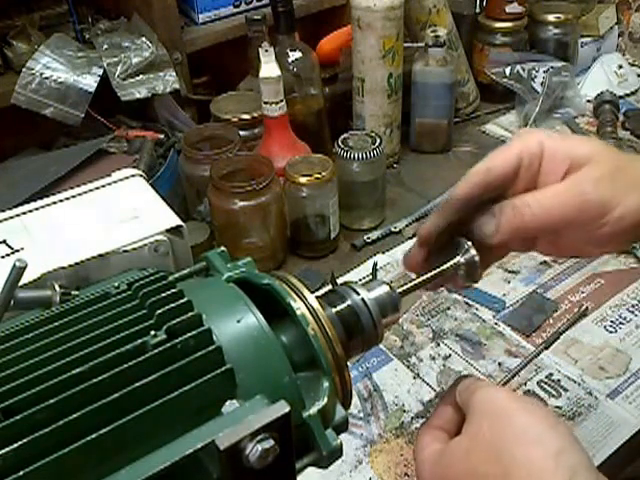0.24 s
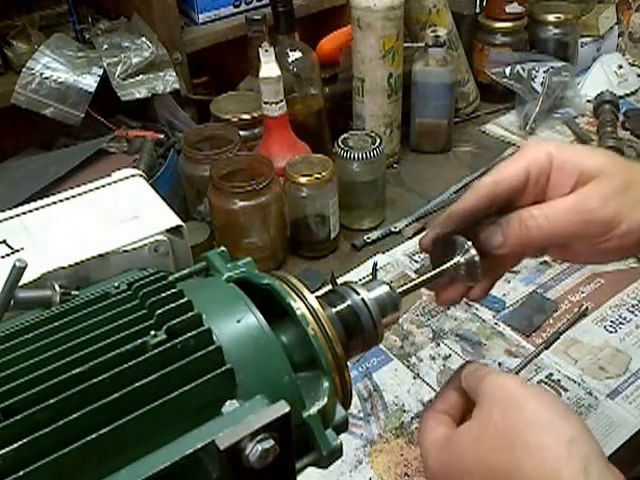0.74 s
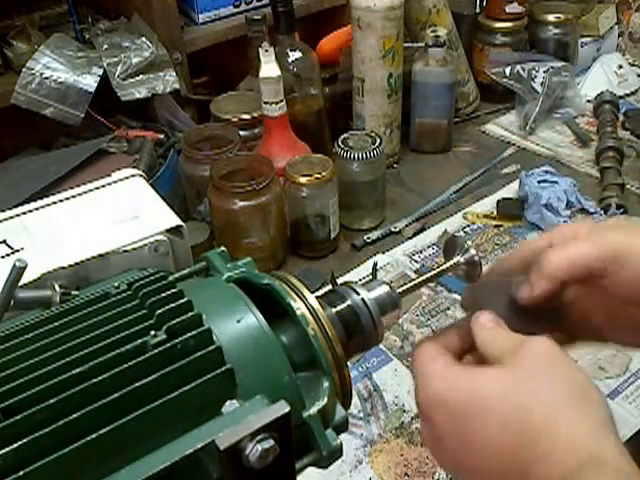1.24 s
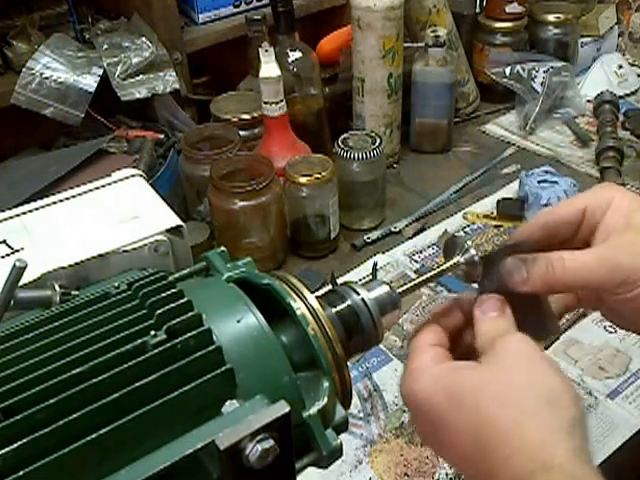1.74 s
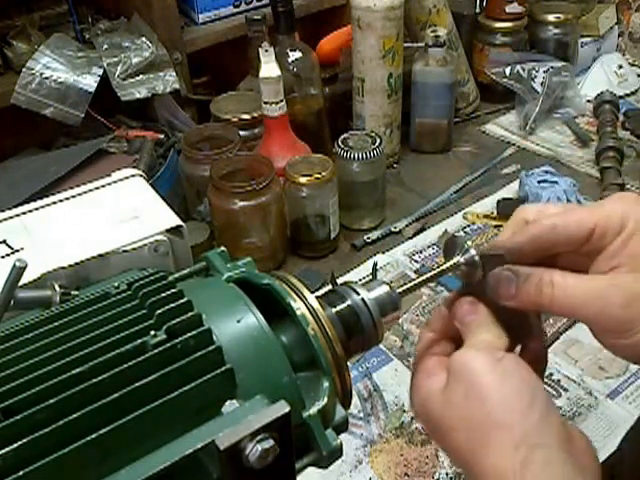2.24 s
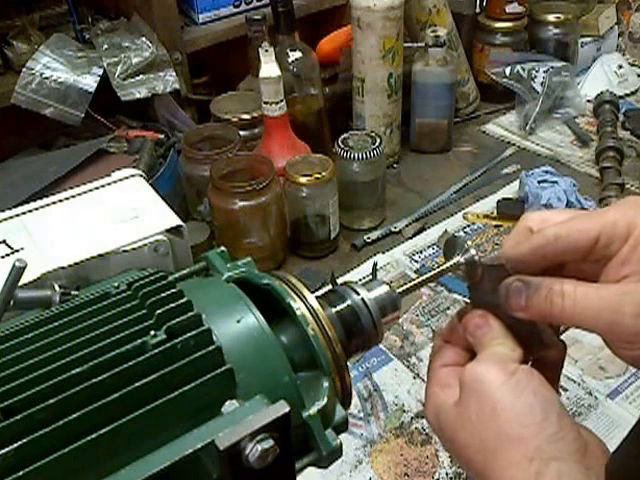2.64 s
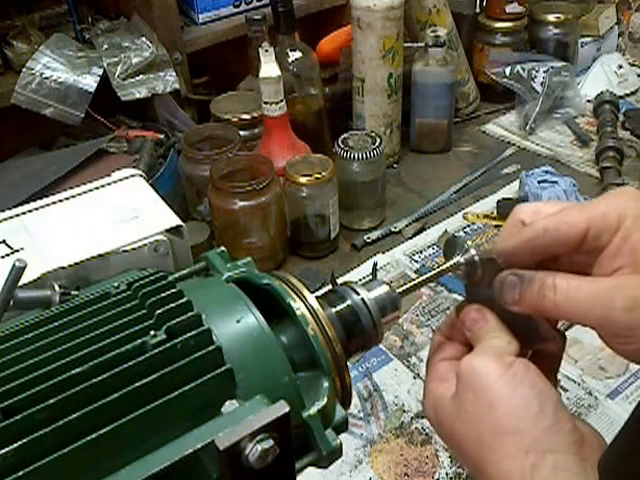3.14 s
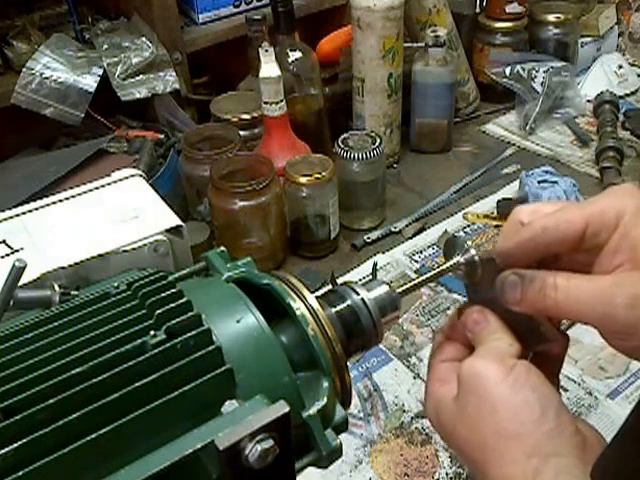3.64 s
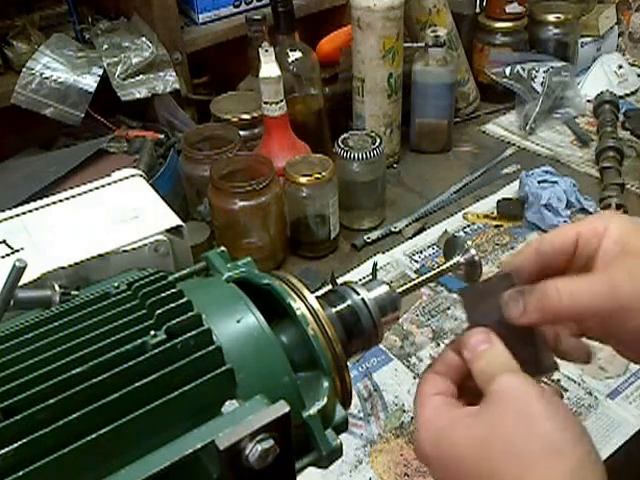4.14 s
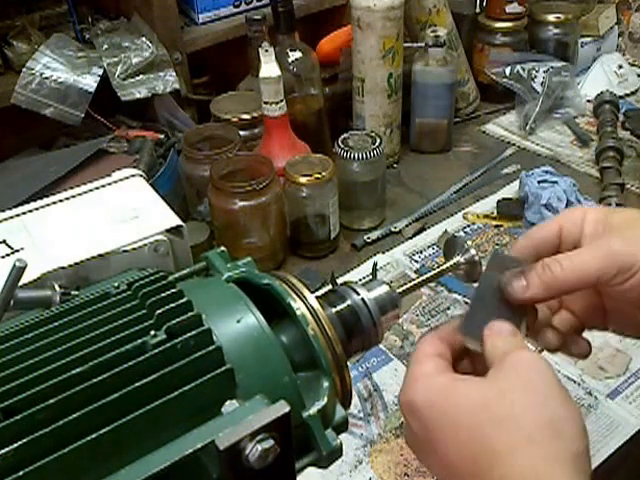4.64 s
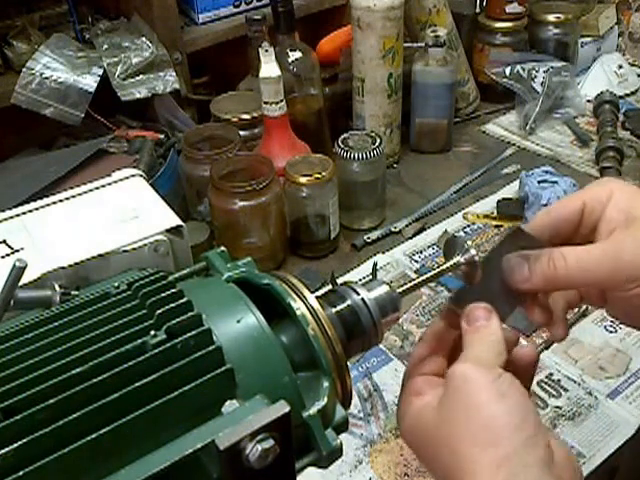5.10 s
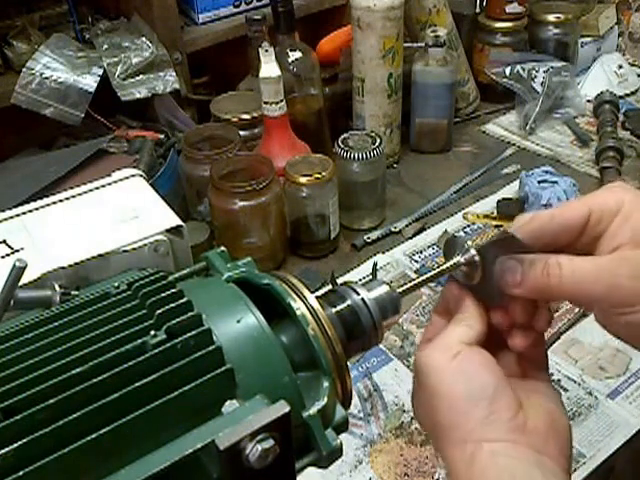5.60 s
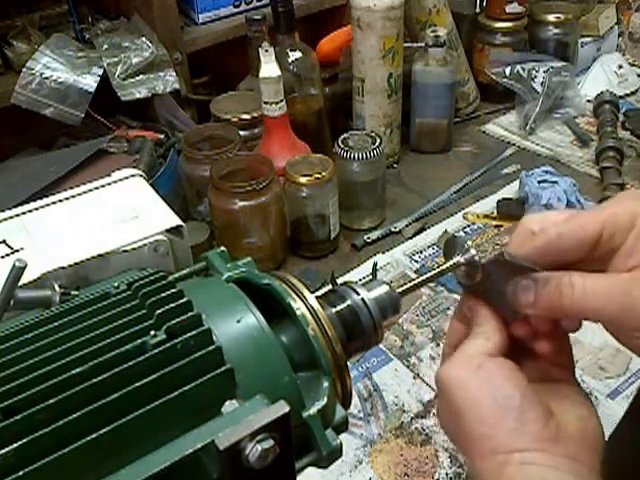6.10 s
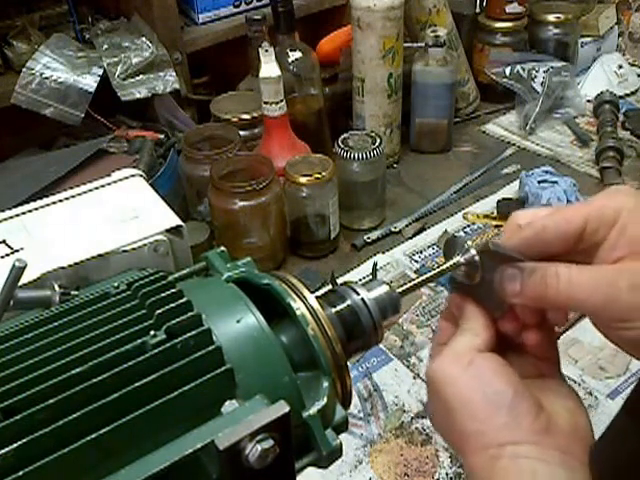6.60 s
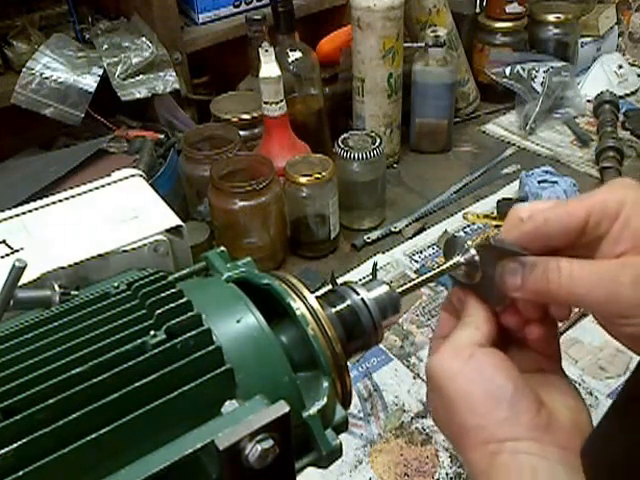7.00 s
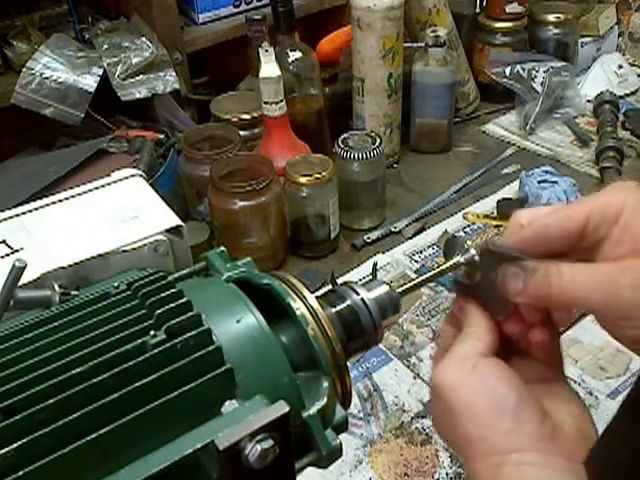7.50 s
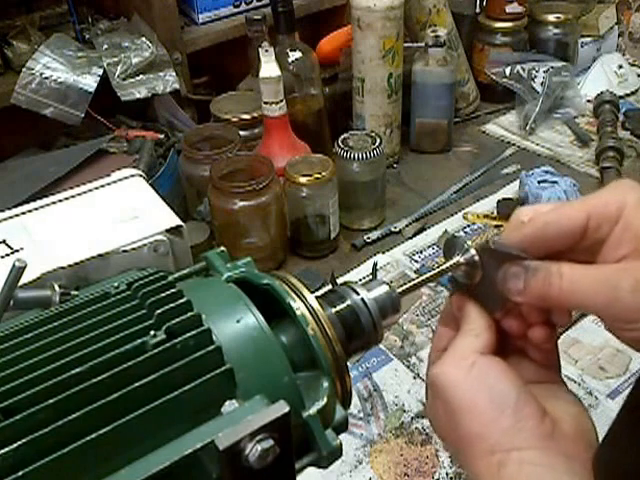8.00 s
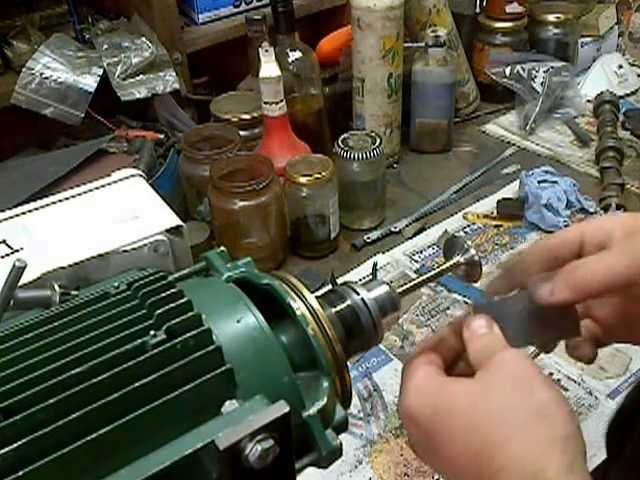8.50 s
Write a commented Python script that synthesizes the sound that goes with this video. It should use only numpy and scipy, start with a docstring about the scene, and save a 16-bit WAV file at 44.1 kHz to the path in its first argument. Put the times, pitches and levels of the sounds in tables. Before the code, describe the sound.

An electric motor hums and whirs steadily while sandpaper hisses against spinning steel in three passes, with sharp little snaps.

```python
"""A motor whirs and hums while abrasive paper hisses on spinning steel.
The induction motor stands on a workbench with an engine valve in its chuck: magnetic hum, fan air and
dry bearings ringing the finned housing. The paper is held to the valve head in three passes; its grit
hisses and rings the steel, its edge snags and snaps, and the bent sheet drones now and then.
A small mono microphone close by has a deep notch in the treble."""
import sys
import numpy as np
from scipy import signal
from scipy.fft import rfft, irfft
from scipy.io import wavfile

SR = 44100
rng = np.random.default_rng(int(sys.argv[2]) if len(sys.argv) > 2 else 0)


def wrap_up_sound(samples):
    """Save the sound to the file named by the first command line argument, as 16-bit audio."""
    columns = np.atleast_2d(samples).T
    # keep every value between -1 and 1, then stretch to whole-number steps
    tamed = np.clip(columns, -1, 1)
    steps = np.round(tamed * 32767).astype(np.int16)
    wavfile.write(sys.argv[1], SR, steps)


N = 385875
TIME = np.arange(N) / SR
FREQS = np.maximum(np.fft.rfftfreq(16384, 1 / SR), 1)  # Hz axis of every tone colour
SHAFT_HZ = 49.5

# Magnetic hum and shaft tones. Each row: pitch in Hz, level in dB.
HUM_TONES = [(199.5, -65), (244.5, -58.5), (495.3, -50.5), (549, -63.5), (648, -52), (748, -60),
             (989.5, -55.5)]
# Air from the cooling fan. Each row: frequency in Hz, level in dB.
FAN_AIR = [(25, -105), (60, -99), (120, -102.5), (165, -91), (215, -77), (300, -70), (700, -67),
           (1000, -69.5), (2200, -77.5), (3900, -81), (5500, -85.5), (7000, -88), (10000, -92),
           (14500, -95.5)]
# Broad rush of the bearing balls. Each row: frequency in Hz, level in dB.
BEARING_RUSH = [(200, -110), (800, -84), (1170, -65.5), (1650, -64), (1900, -67), (2200, -77.5),
                (2700, -69.5), (3400, -79), (6000, -105)]
# Ring of the housing and end shields. Each row: pitch in Hz, width in Hz, level in dB.
HOUSING_MODES = [(339.1, 20.7, -63), (1427, 42, -61.5), (1478, 28.4, -56), (1760, 30, -61),
                 (1827, 27, -59.5), (2510, 50, -73), (2903, 110, -62.5), (3052, 115, -64.5),
                 (3930, 230, -79.5), (12000, 400, -91), (13090, 320, -78.5), (14100, 300, -84)]
# The bearings ease off while the shaft is pressed. Each row: time in seconds, gain in dB.
BEARING_LEVEL = [(2.4, 1), (2.9, 0), (4.1, -0.5), (4.7, .5), (5.8, 1), (6.3, -1), (8.75, -.5)]
# Steady pressure of the paper, one curve a pass. Each row: time in seconds, gain in dB.
PASSES = [
    [(0, -45.5), (0.09, -34.5), (0.31, -47.5), (0.68, -38.5), (0.92, -48), (1.02, -41.5), (1.37, -43),
     (1.45, -63)],
    [(2.42, -60), (2.44, -39.5), (2.56, -31.5), (2.78, -29.5), (3.08, -35), (3.9, -37.5), (4.52, -37.5),
     (4.56, -65)],
    [(6.07, -67), (6.09, -44), (6.19, -44.5), (6.26, -33.5), (6.6, -34), (7.2, -37), (7.7, -39.5),
     (8.02, -42), (8.75, -43.5)],
]
# Short scrapes as the hand shifts. Each row: peak time in seconds, length in seconds, gain in dB.
SCRAPES = [(0.243, 0.022, -36), (0.45, .02, -38), (0.614, .03, -36), (0.73, 0.03, -39), (2.57, 0.022, -31),
           (2.918, .04, -29.5), (3.3, .08, -33), (3.55, .1, -38), (3.785, 0.072, -34), (3.989, .012, -30.5),
           (4.402, 0.037, -28.5), (4.526, 0.016, -31), (4.642, 0.016, -39.5), (5.747, 0.045, -47.5),
           (6.093, .01, -35.5), (7.357, 0.033, -39), (7.56, .04, -34.5), (7.937, 0.034, -35),
           (8.022, 0.011, -36), (8.097, 0.04, -32), (8.237, 0.06, -31), (8.285, 0.049, -31.5),
           (8.39, .04, -38.5), (8.465, .025, -32.5), (8.516, .02, -36), (8.733, 0.019, -37.5)]
# Hiss of grit on steel. Each row: frequency in Hz, level in dB.
GRIT_HISS = [(30, -65), (130, -62.5), (400, -50.5), (2000, -46), (3000, -37), (3800, -36), (5000, -41.5),
             (6000, -38.5), (6600, -38), (9700, -42), (11000, -48), (12200, -46.5), (13500, -58),
             (15000, -73)]
# Ring of the valve head and stem. Each row: pitch in Hz, width in Hz, level in dB.
HEAD_MODES = [(2885, 60, -33), (3620, 70, -33), (3912, 50, -26.5), (4085, 45, -32), (4232, 30, -31.5),
              (4343, 35, -29), (4661, 40, -31), (5588, 35, -33), (5780, 35, -33), (10410, 45, -43),
              (11340, 55, -42), (11660, 40, -40), (11870, 45, -42.5), (12086, 55, -39.5)]
# The rim sings under a light touch. Each row: pitch in Hz, width in Hz, level in dB.
RIM_MODES = [(4608, 60, -36), (5205, 30, -33), (5297, 45, -29), (10702, 50, -37), (10790, 40, -40)]
# Rasp of the paper's stiff edge. Each row: centre in Hz, width in Hz, level in dB.
EDGE_RASP = [(4730, 660, -38.5), (5740, 640, -32), (6270, 280, -33), (9850, 480, -36.5),
             (10470, 270, -38.5)]
# Lean of the paper, from flat on the head (-) to edge on (+). Each row: time in seconds, balance in dB.
PAPER_LEAN = [(0.5, 2.5), (0.72, -6), (1.0, 0), (2.58, 2), (2.9, -10), (3.05, 2), (3.3, -5), (4.3, -5),
              (6.1, 8), (6.8, 1.5), (7.6, 2), (8.3, 9)]
# The rim's ring falls away after the first pass. Each row: time in seconds, gain in dB.
RIM_LEVEL = [(0, -2), (0.5, 3), (1.4, 6), (2.4, -20)]
# The paper's edge catches. Each row: start in seconds, level in dB, treble tilt in dB per octave.
SNAGS = [(0.0867, -9, 0), (0.511, -10, 4), (0.6404, -13, 0), (0.7988, -13, -3), (0.9966, -20, 1),
         (1.293, -19, 2), (2.5701, -6, 5), (2.6286, -11, 0), (2.7601, -8, -2), (2.9193, -13, -2),
         (3.006, -9.5, 1), (3.255, -8, 0), (3.297, -10, 1), (4.396, -12, 0), (4.4015, -6.5, 0),
         (4.4214, -19, -2), (5.5422, -14.5, 0), (6.1584, -15, 4), (7.2684, -16, 1), (7.517, -13, -6),
         (7.5517, -12.5, 2), (7.5906, -14.5, -8), (7.647, -12, 3.5), (8.088, -13, 3), (8.1007, -11, 10),
         (8.1064, -14, 7), (8.2312, -12, 6), (8.2864, -8, 3), (8.301, -9, 6), (8.4484, -4.5, 0),
         (8.503, -5, -1), (8.5197, -8, 4), (8.6687, -9, 5), (8.7271, -15, 0)]
# Tone colour of a snap. Each row: frequency in Hz, level in dB.
SNAP_COLOUR = [(100, -41), (1500, -19), (2900, -18), (3700, 5.5), (5000, 2), (6200, 3.5), (10000, -3.5),
               (12500, -13), (15000, -37)]
# Swells of the taut paper. Each row: peak time in seconds, spread in seconds, pitch in Hz, level in dB.
DRONES = [(2.75, 0.41, 680, -47), (4.02, 0.26, 531, -42.5), (6.33, .2, 668, -41.5)]


def from_db(db):
    """Decibels to gain."""
    return 10 ** (np.asarray(db) / 20)


def unit_rms(x):
    """Scale to unit rms."""
    return x / np.sqrt(np.mean(x ** 2) + 1e-20)


def ride(points, **ends):
    """A fader ride through (seconds, dB) points, in dB."""
    return np.interp(TIME, *np.transpose(points), **ends)


def drift(rate_hz):
    """Smooth random wobble of unit rms, moving at up to about rate_hz."""
    hop = 40
    pole = np.exp(-2 * np.pi * rate_hz * hop / SR)
    noise = rng.standard_normal(N // hop + 2002)
    slow = signal.lfilter([1], [1, -2 * pole, pole * pole], noise)[2000:]  # let the filter settle
    return np.interp(np.arange(N) / hop, np.arange(len(slow)), unit_rms(slow))


def broad(points):
    """Power response of a broad EQ curve through (Hz, dB) points."""
    hz, db = np.transpose(points)
    return from_db(np.interp(np.log(FREQS), np.log(hz), db)) ** 2


def resonant(modes):
    """Power response of (Hz, width, dB) resonances, each with steep skirts."""
    return sum(from_db(db) ** 2 / (1 + ((FREQS - hz * hz / FREQS) / width) ** 2 / 2) ** 2
               for hz, width, db in modes)


def impulse(power):
    """Causal (minimum-phase) impulse response of a power response."""
    cepstrum = irfft(np.log(power + 1e-20))
    half = len(cepstrum) // 2
    cepstrum[0] /= 2
    cepstrum[half:] = 0
    return irfft(np.exp(rfft(cepstrum)))[:half]


def through(drive, power):
    """Colour a white drive: at unit rms it takes on the given power per Hz."""
    response = impulse(power * SR / 2)
    return signal.fftconvolve(np.pad(drive, (len(response) - 1, 0), "wrap"), response, "valid")


def grains(per_s, spread_db):
    """Tiny impacts at random moments, most weak and a few strong; unit rms."""
    sizes = from_db(spread_db * np.minimum(rng.exponential(1, N), 4)) * rng.choice([-1, 1], N)
    return unit_rms(sizes * (rng.random(N) < per_s / SR))


def once_a_turn(depth_db):
    """Tremolo of a part that runs slightly out of true."""
    return from_db(depth_db * np.sin(2 * np.pi * SHAFT_HZ * TIME + rng.uniform(0, 2 * np.pi)))


def hum(waver_db=3.5, wander_hz=0.66):
    """Tones of the magnetic field and the rotor, wavering in level and a little in pitch."""
    out = 0
    for hz, db in HUM_TONES:
        phase = 2 * np.pi * np.cumsum(hz + wander_hz * drift(2.95)) / SR
        out = out + np.sqrt(2) * from_db(db + waver_db * drift(1.47)) * np.sin(phase)
    return out


def fan():
    """The cooling fan blows a smooth bed of air."""
    return through(rng.standard_normal(N), broad(FAN_AIR))


def bearings():
    """Dry balls rattle over their races and ring the housing."""
    rattle = grains(per_s=7000, spread_db=2.0) * once_a_turn(depth_db=0.6)
    return through(rattle * from_db(ride(BEARING_LEVEL)), broad(BEARING_RUSH) + resonant(HOUSING_MODES))


def paper_contact(rise_share=0.47):
    """Gain of the rubbing: the steady pressure of the passes, with scrapes swelling and fading on top."""
    power = sum(from_db(ride(pressure, left=-120, right=-120)) ** 2 for pressure in PASSES)
    for peak_s, length, db in SCRAPES:
        spread = length * np.where(TIME < peak_s, rise_share, 1 - rise_share)
        power = power + from_db(db) ** 2 * np.exp(-((TIME - peak_s) / spread) ** 2)
    return np.sqrt(power)


def sanding(flutter_db=0.57, surge_db=0.7, trim_db=-0.34):
    """Grit scores the spinning steel; held flat the paper rings the head, edge on it rasps."""
    grit = grains(per_s=9000, spread_db=5.5) * once_a_turn(depth_db=0.6)
    grit = grit * paper_contact() * from_db(trim_db + flutter_db * drift(45) + surge_db * drift(8.5))
    lean_db = ride(PAPER_LEAN)
    head_db = -5.5 - 0.62 * lean_db
    edge_db = -5 + lean_db
    out = through(grit, broad(GRIT_HISS))
    for modes, send_db in ((HEAD_MODES, head_db), (RIM_MODES, ride(RIM_LEVEL)), (EDGE_RASP, edge_db)):
        strikes = grit * rng.choice([-1, 1], N) * from_db(send_db)  # each part gets its own texture
        out = out + through(strikes, resonant(modes))
    return out


def snags(crackle_t60=0.016, crackle_db=-19.0, head_db=30):
    """The paper catches: a sharp snap and a short crackle of loosened grit, both ringing the valve head."""
    out, age = np.zeros(N + SR), TIME[:SR // 10]
    crackles = grains(per_s=5000, spread_db=1.5)
    colour = broad(SNAP_COLOUR) + resonant(HEAD_MODES) * from_db(head_db) ** 2
    octaves = np.log2(np.maximum(FREQS, 2000) / 5000)  # the tilt pivots at 5 kHz, flat below 2 kHz
    for k, (start_s, db, tilt_db) in enumerate(SNAGS):
        drive = from_db(crackle_db - 60 * age / crackle_t60) * crackles[k * len(age):(k + 1) * len(age)]
        drive[0] = 1  # the snap's transient
        ring = impulse(colour * from_db(tilt_db * octaves) ** 2)
        snap = signal.fftconvolve(drive, ring / np.abs(ring).max())
        start = round(start_s * SR)
        out[start:start + len(snap)] += from_db(db) * snap
    return out[:N]


def paper_drone(width_hz=70):
    """The taut sheet, bent round the valve, resonates low for a moment as the pressure swells."""
    out = 0
    for peak_s, spread, hz, db in DRONES:
        drone = unit_rms(through(rng.standard_normal(N), resonant([(hz, width_hz, 0)])))
        out = out + drone * from_db(db) * np.exp(-((TIME - peak_s) / spread) ** 2 / 2)
    return out


def workbench(x, echo_db=-12, echo_t60=0.15):
    """Bench top, jars and shelves scatter a dense, quickly dying cloud of echoes."""
    age = TIME[:SR // 4]
    echoes = rng.standard_normal(len(age)) * from_db(-60 * age / echo_t60) * (age > .001)
    return x + from_db(echo_db) * signal.fftconvolve(x, echoes / np.linalg.norm(echoes))[:N]


def scene():
    """A dry motor bed under the hand work and its bench echoes, alike in both channels."""
    motor = hum() + fan() + bearings()
    hand_work = sanding() + snags() + paper_drone()
    mono = motor + workbench(hand_work)
    return np.array([mono, mono])


def record(dry, notch_hz=8000, notch_width_hz=1080, notch_db=-31, cutoff_hz=14650):
    """The microphone carves a deep notch in the treble and cuts the top steeply."""
    notch = from_db(notch_db / (1 + ((FREQS - notch_hz) / notch_width_hz) ** 2 / 2) ** 2)
    coloured = signal.fftconvolve(dry, impulse(notch ** 2)[None], axes=1)[:, :N]
    high_cut = signal.ellip(12, .2, 80, cutoff_hz, fs=SR, output="sos")
    return signal.sosfilt(high_cut, coloured)


dry = scene()
out = record(dry)
wrap_up_sound(out)
```